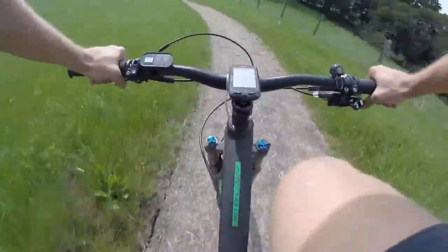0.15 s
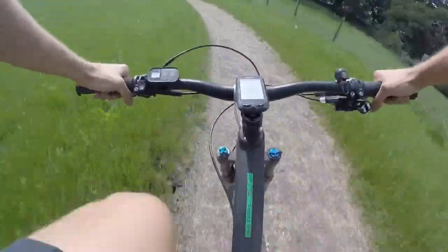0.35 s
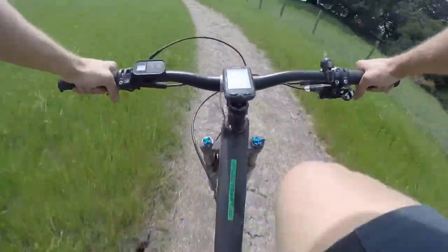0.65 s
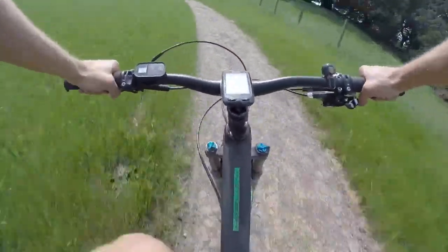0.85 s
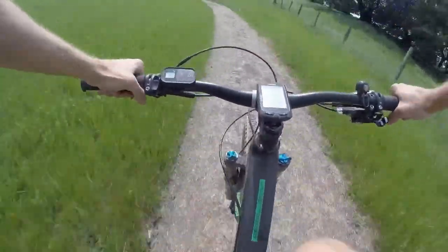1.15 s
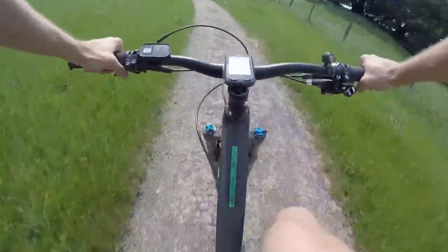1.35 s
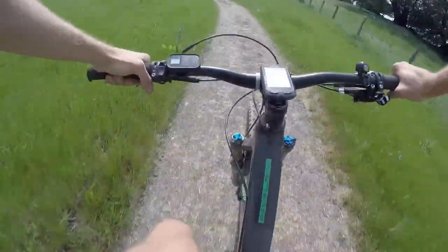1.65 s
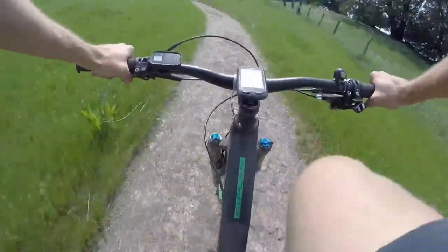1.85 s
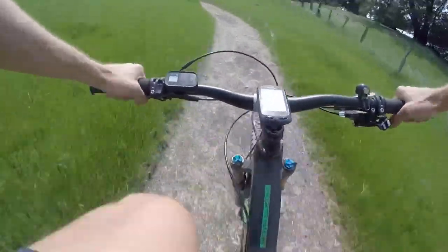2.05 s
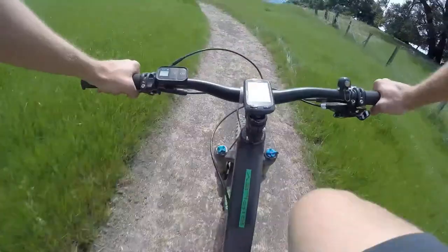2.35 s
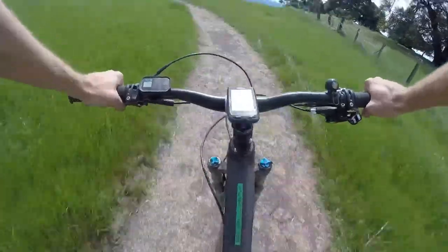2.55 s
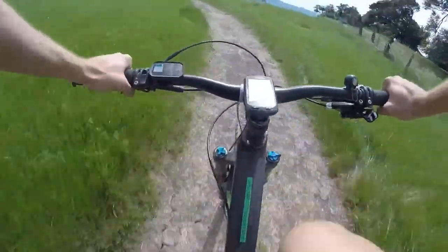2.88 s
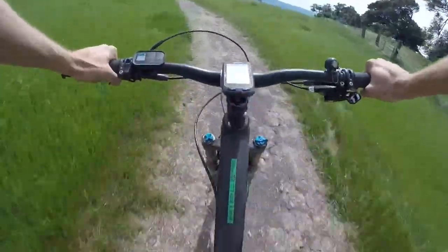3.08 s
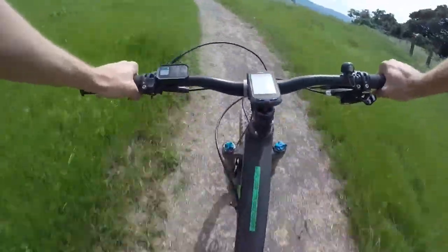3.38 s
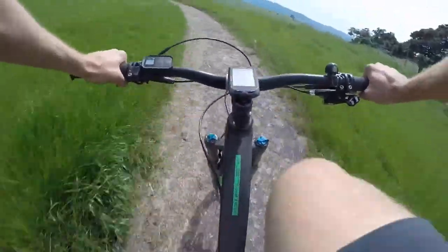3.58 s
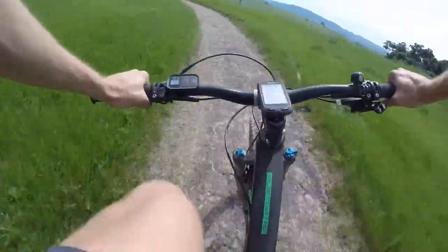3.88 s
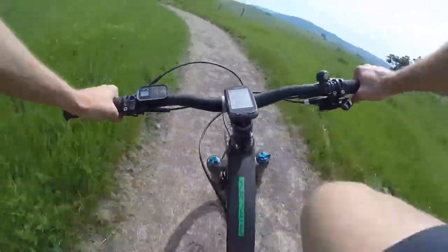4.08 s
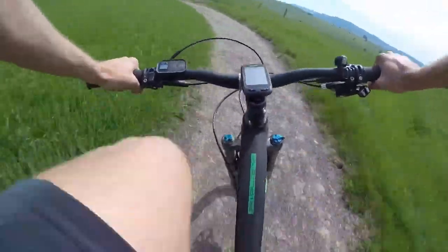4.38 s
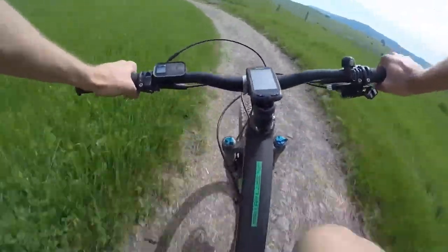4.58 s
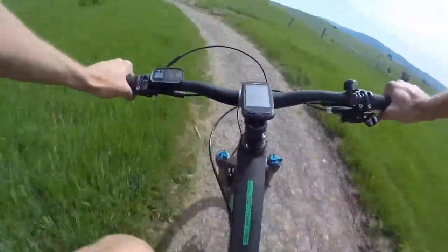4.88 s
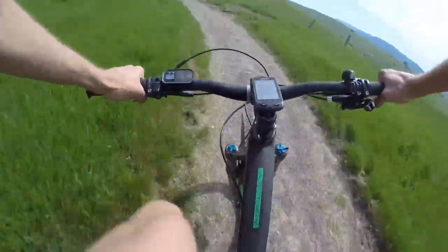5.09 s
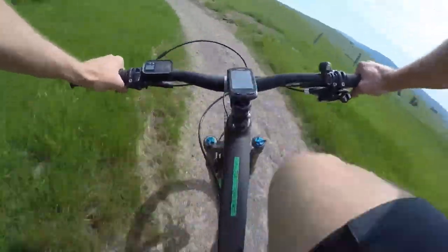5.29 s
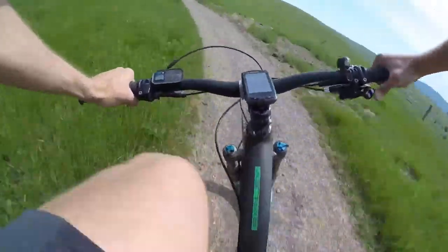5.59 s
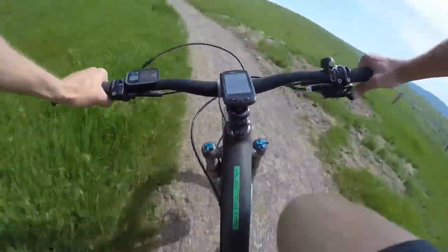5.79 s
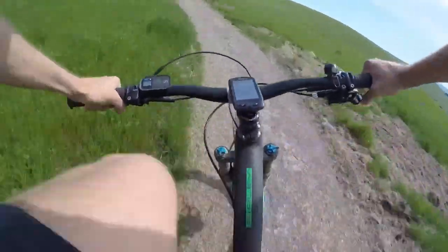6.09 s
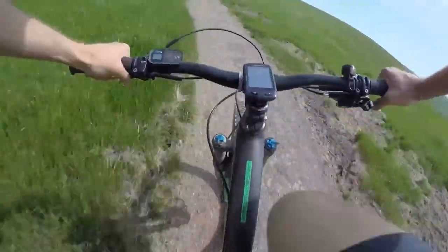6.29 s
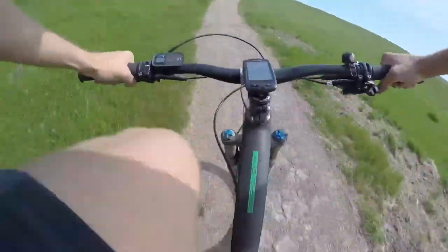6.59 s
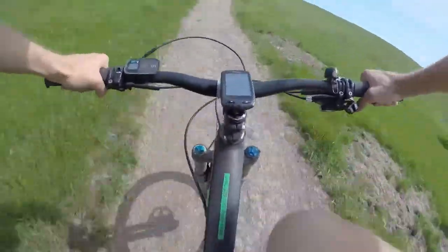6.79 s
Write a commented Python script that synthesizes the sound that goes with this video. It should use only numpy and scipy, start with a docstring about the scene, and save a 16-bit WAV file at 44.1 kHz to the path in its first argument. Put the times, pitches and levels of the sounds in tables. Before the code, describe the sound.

For about seven seconds a bicycle climbs an open gravel trail, heard close and dry from a plastic-cased microphone strapped to the chest. Very deep, uneven swaying rumble and a muffled heartbeat, about three beats a second, run throughout beneath a quiet, clumpy hiss of tyre grit. Short boomy jolts knock the case, with small dull taps between. Bright pebble cracks start at 0.2 s and recur irregularly. Stones clack on the hollow frame at 0.6, 0.9, 1.05, 1.9 and 2.3 s, hardest at 2.75, then at 3.4, 5.2 and 6.3. Brief rough plastic squeaks and rubs come from 2.5 s, again around 3.7, and often after 4.2. Faint, very high insect chirps repeat four or five times a second until 4.9, returning at 6.0. The sharpest, loudest stone crack snaps at 5.85 s; a tiny two-tone insect buzz follows at 6.1. Crunching continues to the end.

```python
"""A bicycle climbs a gravel trail, heard by a camera in a plastic case strapped to the rider's chest.
From the start the mount sways at very low pitch in filtered noise, and tyres crunch in clouds of grit ticks.
Faint sine chirps come from the grass, then ringing stone cracks, jolts with a low boom, and decaying-sine
heartbeats three times a second; from 0.6 s stones clack on the frame tube, one hardest at 2.8 s.
From 2.5 s longer rubs squeak in the case; a stone cracks loudest at 5.9 s and a two-tone buzz follows at 6.1 s."""
import sys
import numpy as np
from scipy import signal
from scipy.fft import rfft, irfft
from scipy.io import wavfile
from scipy.ndimage import uniform_filter1d

SR = 44100
rng = np.random.default_rng(int(sys.argv[2]) if len(sys.argv) > 2 else 0)


def magnitude_from_level(level_db):
    """Linear magnitude for a level in decibels (20 dB per decade)."""
    exponent = np.asarray(level_db, float) / 20
    return 10 ** exponent


def log_audio(samples):
    """Write samples as a 16-bit WAV file to the path given in sys.argv[1]."""
    # one column per channel
    frames = np.atleast_2d(samples).T
    # limit to full scale, then quantise
    limited = np.clip(frames, -1, 1)
    pcm = np.round(limited * 32767).astype(np.int16)
    wavfile.write(sys.argv[1], SR, pcm)


N = 306048  # samples

# insect chirps: start_s
CHIRP_STARTS = [.08, .32, .529, .721, .934, 1.163, 1.377, 1.555, 1.764, 1.955, 2.168, 2.4, 2.602, 2.794,
                3.0, 3.223, 3.405, 3.635, 3.864, 4.025, 4.279, 4.458, 4.702, 4.922, 6.005, 6.186, 6.381,
                6.537, 6.762]
# tyres on grit, joined by straight lines: time_s, level_db
CRUNCH_LEVEL = [(0.0, -50), (1.31, -49), (1.66, -51), (2.63, -49), (2.9, -50), (3.19, -50), (3.67, -52.5),
                (4.1, -48), (4.48, -51.5), (5.32, -49), (5.82, -48), (6.22, -50), (6.57, -47), (6.94, -53)]
# resonances of the camera case: pitch_hz, width_hz, level_db (relative)
CASE_MODES = [(366.4, 84, 10), (783, 148, 4), (1544, 250, 1), (2290, 272, 0.5), (2475, 307, 1.5),
              (2964, 736, -6.5), (4128, 407, -8), (4528, 480, -10), (5976, 600, -12), (7730, 1040, -24),
              (8890, 1300, -27.5), (10800, 3400, -34), (12140, 430, -33.5), (1034, 123, -13.5)]
# longer rubs of the case against its mount: start_s, length_s, level_db
CASE_RUBS = [(2.474, 0.024, -48), (2.556, 0.026, -47), (2.619, 0.029, -46), (2.668, 0.046, -49.5),
             (3.661, 0.022, -47), (3.694, 0.029, -48), (4.204, 0.024, -50), (4.461, 0.082, -49),
             (4.659, 0.037, -44), (4.708, 0.047, -48), (4.793, 0.035, -50), (5.387, 0.022, -51),
             (5.467, 0.018, -46.5), (5.505, 0.019, -48.5), (5.676, 0.017, -47), (5.751, 0.029, -48),
             (6.01, 0.03, -49), (6.258, 0.027, -54), (6.425, 0.033, -50.5), (6.575, 0.034, -53),
             (6.668, 0.02, -47), (6.768, 0.025, -48)]
# loudest stones flicked or cracked by the tyres: start_s, crack_peak_db, hardness_octaves (above 250 Hz, ring most)
STONE_CRACKS = [(0.167, -36, 4.3), (0.299, -37, 4.4), (0.4884, -36.5, 4.5), (0.602, -38.5, 4.5),
                (0.685, -38, 4.7), (1.155, -41, 6), (1.1728, -38, 5.1), (1.211, -36.5, 4.05),
                (1.261, -33.5, 4.43), (1.282, -36.5, 3.6), (1.404, -37, 5.8), (1.578, -47, 6.2),
                (1.6167, -42, 4.5), (2.0817, -35, 5.4), (2.147, -45, 5.6), (2.19, -34.5, 4.2),
                (2.4958, -35.5, 4.55), (3.001, -33, 4.64), (3.016, -42, 5.1), (3.1363, -45, 5),
                (3.2306, -38.5, 3.2), (3.6402, -32.5, 4.53), (3.7256, -39.5, 4.5), (4.16, -34.5, 4.55),
                (4.342, -40, 5), (4.485, -35, 4.2), (4.694, -35.5, 4.5), (4.8347, -38, 4.35),
                (5.048, -45.5, 5.4), (5.088, -36, 4.2), (5.257, -38, 4.6), (5.655, -34, 4.7),
                (5.7808, -41, 5.1), (5.8504, -16.5, 5.28), (5.958, -34.5, 4.7), (5.982, -38, 5.2),
                (6.047, -39.5, 4.8), (6.2836, -45, 5.7), (6.428, -32.5, 4.86), (6.438, -41, 5.4),
                (6.894, -40.5, 5.7)]
# stones thrown against the frame: start_s, ring_peak_db, hardness_octaves (above 250 Hz, ring most)
FRAME_HITS = [(.6225, -28, 2.3), (.911, -24, 2.03), (1.0522, -19, 3.5), (1.8665, -22, 2.15),
              (2.324, -34, 1.6), (2.755, -13.5, 2.78), (2.772, -36, 2.6), (3.356, -22, 2.4),
              (5.2373, -26, 2.34), (6.332, -28.5, 1.5)]
# modes of the frame tube: pitch_hz, width_hz, level_db (relative)
FRAME_MODES = [(364, 88, 8), (840, 306, 6), (1476, 134, -0.5), (2227, 137, -2), (2483, 103, -7.5),
               (3050, 120, -15), (4520, 264, 1), (5770, 240, -10.5), (7500, 180, -30), (8800, 500, -25)]
# jolts of the mount: time_s, thud_peak_db, knock_peak_db (knock of the case)
MOUNT_JOLTS = [(.197, -22.5, -37), (0.262, -20.5, -39), (.787, -21, -30.5), (1.626, -17, -27.5),
               (1.91, -16.5, -30.5), (1.96, -19, -29.5), (2.423, -32, -44), (2.518, -19.5, -55),
               (2.613, -20.5, -44), (2.764, -17.5, -45), (3.555, -27, -33.5), (3.651, -17.5, -59),
               (3.767, -16, -35), (3.815, -21, -37), (3.92, -15.5, -23.5), (4.459, -23, -45),
               (4.704, -18, -41), (4.842, -21, -32), (4.918, -21, -32.5), (5.64, -15, -25),
               (5.73, -20.5, -37), (5.975, -20.5, -48), (6.561, -16.5, -52), (6.656, -26, -35),
               (6.822, -21.5, -39), (6.866, -21, -31)]
# heartbeats, at the deepest point of the kick: time_s, kick_peak_db
HEARTBEATS = [(0.314, -22.2), (0.647, -23.5), (0.966, -19.5), (1.308, -21), (1.631, -26), (1.946, -23.5),
              (2.276, -21.5), (2.602, -22), (2.932, -21), (3.263, -17.5), (3.583, -18.5), (3.924, -18.5),
              (4.248, -20), (4.571, -22.5), (4.901, -17), (5.23, -21), (5.552, -20.5), (5.884, -21),
              (6.222, -23), (6.537, -21.5), (6.867, -22.5)]
# spectrum of the mount's shaking: pitch_hz, level_db (per Hz, relative)
SHAKE_SPECTRUM = [(5.0, -12), (16, 3.5), (39, -3.5), (52, -26), (75, -14.5), (128, -14.5), (349, -29.5),
                  (501, -46.5), (600, -37.5), (780, -43), (1320, -120)]
# strongest heaves of the chest mount, at their tops: time_s, level_db
MOUNT_HEAVES = [(.29, -21), (.48, -20), (.59, -22), (.70, -25), (.81, -23.5), (1.29, -17.5), (1.47, -21),
                (1.82, -28), (2.02, -26), (2.19, -23), (2.463, -18), (3.28, -23), (3.78, -24),
                (4.226, -17.5), (4.44, -26.5), (4.69, -24), (5.03, -26), (5.43, -18.5), (5.79, -22.5),
                (6.28, -27.5), (6.54, -20), (6.72, -27)]
# moments when the mount hangs still: middle_s, half_width_s
STILL_MOMENTS = [(.40, 0.035), (1.12, 0.02), (1.70, 0.024), (2.70, 0.044), (4.10, 0.053), (5.14, 0.027),
                 (5.56, 0.066), (5.93, 0.15)]

# louder grit is coarser: dB of treble lost per dB above this faint reference level
REFERENCE_CRUNCH_DB, COARSENING = -57.5, 0.85
JOLT_RUB_S, JOLT_RUB_DB = 0.0151, -30.5  # each jolt brings a short rub, this far under its thud
SQUEAK_HZ, SQUEAK_WANDER, SQUEAK_DB = 740, 0.031, -6  # mean pitch, its rms wander (fraction), level under the rub
SCRAPE_BELOW_DB, SCRAPE_SPAN_DB = -28.5, 9  # weaker stones scrape more than they ring
DULL_HZ, THUD_HZ = 840, 106.5  # case ring favoured by a soft push; mean pitch of the mount's boom
HEAVE_S, REST_DB, FLUTTER_DB = 0.027, -28.5, 1  # half width of a heave; sway at rest, and its rms flutter
LULL_DB = -5.5  # dip of the sway in a still moment


def evened(x):
    """Scales to rms 1."""
    return x / np.sqrt(np.mean(x ** 2) + 1e-20)


def peaked(x):
    """Scales to peak 1."""
    return x / abs(x).max()


def curve(rows):
    """Joins rows by straight lines, one array a column."""
    s, *columns = np.transpose(rows)
    return [np.interp(np.arange(N) / SR, s, c) for c in columns]


def add(mix, s, sound):
    """Adds a sound into the mix at a time."""
    part = mix[round(s * SR):][:len(sound)]
    part += sound[:len(part)]


def tilted(x, db_per_octave, pivot_hz=3000):
    """Tips the spectrum around a pivot."""
    hz = np.fft.rfftfreq(len(x), 1 / SR)
    return irfft(rfft(x) * magnitude_from_level(db_per_octave * np.log2((hz + 100) / pivot_hz)), len(x))


def slow_noise(top_hz):
    """Low-passed noise of rms 1, for wandering levels."""
    low = signal.butter(2, top_hz, fs=SR, output="sos")
    return evened(signal.sosfiltfilt(low, rng.standard_normal(N)))


def smooth_noise(first, second):
    """Noise of rms 1, averaged over two window lengths in samples."""
    return evened(uniform_filter1d(uniform_filter1d(rng.standard_normal(N), first), second))


def clicks(per_s, spread_db):
    """Random clicks of either sign; a few stand far above the rest, or far below if the spread is negative."""
    hit = rng.random(N) < per_s / SR
    sign = rng.choice([-1., 1.], N)
    return hit * sign * magnitude_from_level(spread_db * np.minimum(rng.exponential(1, N), 3))


def ring(hz, width_hz, rise_s, seconds=.12):
    """A dying sine with a soft start."""
    t = np.arange(round(seconds * SR)) / SR
    return (1 - np.exp(-t / rise_s)) * np.exp(-np.pi * width_hz * t) * np.sin(2 * np.pi * hz * t)


def burst(noise, rise_s, fall_s):
    """A few milliseconds of scraping contact, shaped by a quick rise and fall."""
    t = np.arange(len(noise)) / SR
    return noise * (1 - np.exp(-t / rise_s)) * np.exp(-t / fall_s)


def case(x):
    """Sends a sound through the case, whose modes ring in alternating sign."""
    response = 0
    for k, (hz, width, db) in enumerate(CASE_MODES):
        response = response + (-1) ** k * magnitude_from_level(db) * width * ring(hz, width, 1e-5, .03)
    return signal.oaconvolve(x, response)[:len(x)]


def strike(modes, chance, hardness, reach_db, linger, rise_s=0.00061):
    """One blow rings each mode by its own chance; modes far from the favoured octave ring less."""
    t, sound = np.arange(1024) / SR, 0
    uneven_db = 1.5
    for (hz, width, db), (luck, phase) in zip(modes, chance[:2 * len(modes)].reshape(-1, 2)):
        db = db + uneven_db * luck - reach_db * (np.log2(hz / 250) - hardness) ** 2
        tone = np.sin(2 * np.pi * hz * (1 + 0.0052 * luck) * t + 2 * phase)
        sound = sound + magnitude_from_level(db) * np.exp(-np.pi * width * t / linger) * tone
    return peaked(sound * (1 - np.exp(-t / rise_s)) ** 2)


def patchy(x, patch_db):
    """The colour shifts in small patches of time and pitch as the ground changes."""
    z = signal.stft(x, nperseg=256, noverlap=192)[2]
    patches = uniform_filter1d(rng.standard_normal(z.shape), size=4, axis=0)
    patches = uniform_filter1d(patches, size=18, axis=1)
    return signal.istft(z * magnitude_from_level(patch_db * evened(patches)), nperseg=256, noverlap=192)[1][:len(x)]


def insect():
    """Short flat whistles, slightly unsteady, and one longer two-tone buzz from a neighbour."""
    out, t = np.zeros(N), np.arange(round(0.023 * SR)) / SR
    for s, (detune, phase) in zip(CHIRP_STARTS, rng.standard_normal((len(CHIRP_STARTS), 2))):
        tone = np.sin(2 * np.pi * 10570 * (1 + 0.0026 * detune) * t + phase)
        add(out, s, magnitude_from_level(-71.0) * tone * signal.windows.tukey(len(t), .2))
    t = np.arange(round(0.054 * SR)) / SR
    buzz = np.sin(2 * np.pi * 10000 * t) + .8 * np.sin(2 * np.pi * 10550 * t)
    add(out, 6.127, magnitude_from_level(-70) * buzz * signal.windows.tukey(len(t), .1))
    return out


def crunch():
    """Dense grit ticks merge to a hiss in uneven clumps, with pebble grains and sparse bright crackle on top."""
    level_db, = curve(CRUNCH_LEVEL)
    treble_db = COARSENING * (REFERENCE_CRUNCH_DB - level_db)
    clumps_db = 1.25 * smooth_noise(600, 300)
    hiss = evened(clicks(per_s=5000, spread_db=3.5))
    pebble_shape = burst(np.ones(1024), 0.0006, 0.002)
    pebble_hits = abs(clicks(per_s=140, spread_db=5.5))
    pebbles = signal.oaconvolve(pebble_hits, pebble_shape)[:N] * rng.standard_normal(N)
    crackle_shape = burst(np.ones(512), 0.00065, 0.0021)
    crackle_hits = abs(clicks(per_s=70, spread_db=5.))
    crackle = signal.oaconvolve(crackle_hits, crackle_shape)[:N] * rng.standard_normal(N)
    grains = magnitude_from_level(-1) * evened(tilted(pebbles, 1.5)) + magnitude_from_level(-6) * evened(tilted(crackle, 6.3))
    ground = patchy(magnitude_from_level(clumps_db) * (hiss + grains), patch_db=1.4)
    airborne = signal.butter(2, 1100, "high", fs=SR, output="sos")  # little bass comes through the air
    grit = evened(case(signal.sosfilt(airborne, ground)))
    coarse = signal.sosfiltfilt(signal.butter(1, 3000, fs=SR, output="sos"), grit)
    return magnitude_from_level(level_db) * (coarse + magnitude_from_level(treble_db) * (grit - coarse))


def rattle():
    """Rubbing noise rings the modes of the case, with small dull taps in runs throughout."""
    rubbing = np.zeros(N)
    jolt_rubs = [(s, JOLT_RUB_S, thud_db + JOLT_RUB_DB) for s, thud_db, _ in MOUNT_JOLTS]
    for s, seconds, db in list(CASE_RUBS) + jolt_rubs:
        add(rubbing, s, magnitude_from_level(db) * signal.windows.tukey(round(seconds * SR), .4))
    above_thuds = signal.butter(2, 600, "high", fs=SR, output="sos")
    rub_noise = signal.sosfilt(above_thuds, tilted(rng.standard_normal(N), -4.5))
    rubs = rubbing * evened(case(rub_noise))
    runs = magnitude_from_level(3.5 * smooth_noise(4000, 2000))
    taps = runs * clicks(per_s=90, spread_db=-3.5)
    thuds = signal.oaconvolve(taps, ring(112.5, 95, 0.00091))[:N]
    return rubs + magnitude_from_level(-56.5) * evened(case(tilted(taps, -5.5))) + magnitude_from_level(-46.0) * evened(thuds)


def squeak():
    """In the longer rubs plastic slips on plastic in a nearly even train: a short rough note with overtones."""
    pressing = np.zeros(N)
    for s, seconds, db in CASE_RUBS:
        add(pressing, s, magnitude_from_level(db + SQUEAK_DB) * signal.windows.tukey(round(seconds * SR), .6))
    wander, grip = (evened(uniform_filter1d(rng.standard_normal(N), size)) for size in (600, 300))
    turns = np.cumsum(SQUEAK_HZ * (1 + SQUEAK_WANDER * wander)) / SR
    slips = sum(magnitude_from_level(-1.5 * k) * np.cos(2 * np.pi * k * turns) for k in range(1, 5))
    return pressing * magnitude_from_level(3.4 * grip) * evened(slips)


def stones():
    """Bright cracks with little bass: ringing case modes, a short spray of noise and an airy snap."""
    out, chance = np.zeros(N), rng.standard_normal((len(STONE_CRACKS), 1024))
    thin = signal.butter(3, 2200, "high", fs=SR, output="sos")
    airy = signal.butter(2, [7200, 13600], "band", fs=SR, output="sos")
    for (s, db, hardness), noise in zip(STONE_CRACKS, chance):
        scrape = np.clip((SCRAPE_BELOW_DB - db) / SCRAPE_SPAN_DB, 0, 1)  # 0 rings, 1 scrapes
        contact = burst(noise, 0.00057, 0.0033 + 0.00041 * scrape)
        spray = case(tilted(contact, 7.1 * (hardness - 4.2)))
        reach_db = 8.5 - 4.8 * (hardness - 5.5) * (1 - scrape)
        ringing = strike(CASE_MODES, noise, hardness, reach_db, linger=2.5)
        crack = ringing + magnitude_from_level(-7.0 + 10.0 * scrape) * peaked(signal.sosfilt(thin, spray))
        snap = peaked(signal.sosfilt(airy, burst(noise[::-1], 0.00063, 0.0011)))  # reaches past the case
        snap_db = -12.5 + 8.2 * (hardness - 5.5) - 9. * scrape
        add(out, s, magnitude_from_level(db) * (peaked(crack) + magnitude_from_level(snap_db) * snap))
    return out


def clacks():
    """A stone meets the hollow frame with a broad crack, and the tube rings in a few clear bands."""
    out, chance = np.zeros(N), rng.standard_normal((len(FRAME_HITS), 1024))
    for (s, db, hardness), luck in zip(FRAME_HITS, chance):
        crack = peaked(case(burst(luck[::-1], .0006, .0016)))
        tube = strike(FRAME_MODES, luck, hardness, reach_db=3., linger=0.96, rise_s=0.00072)
        add(out, s, magnitude_from_level(db) * (tube + magnitude_from_level(-8.5) * crack))
    return out


def jolts():
    """A short push rings the mount low, in either direction, and knocks the case."""
    out, chance = np.zeros(N), rng.standard_normal((len(MOUNT_JOLTS), 64))
    for (s, thud_db, knock_db), luck in zip(MOUNT_JOLTS, chance):
        thud = peaked(ring(THUD_HZ * (1 + 0.14 * luck[-1]), 133, 0.00085))
        add(out, s + 0.002, np.sign(luck[-2]) * magnitude_from_level(thud_db) * thud)
        knock = strike(CASE_MODES, luck, np.log2(DULL_HZ / 250), reach_db=6.0, linger=1.43)
        add(out, s + 0.00141, magnitude_from_level(knock_db) * knock)
    return out


def heart():
    """Each beat: a sharp inward kick of the chest wall on a slower heave, both dying sines."""
    kick = -peaked(ring(64.5, 31.8, 0.0067))
    heave = -peaked(ring(23.93, 3.8, 0.085, 0.3))
    out = np.zeros(N)
    for s, db in HEARTBEATS:
        add(out, s - .005, magnitude_from_level(db) * kick)
        add(out, s - .058, magnitude_from_level(db - 8.5) * heave)
    return out


def shake():
    """Muscle tremor and bumps rock the mount: a deep wandering sway with rougher noise above it."""
    hz, db = np.transpose(SHAKE_SPECTRUM)
    colour = magnitude_from_level(np.interp(np.log(np.fft.rfftfreq(N, 1 / SR) + 1), np.log(hz + 1), db))
    sway = irfft(rfft(rng.standard_normal(N)) * colour, N)
    slow = signal.sosfiltfilt(signal.butter(2, 40, fs=SR, output="sos"), sway)
    scale = np.std(slow)
    # dividing by the envelope evens out the swing while the pitch wanders
    steady = evened(slow / (abs(signal.hilbert(slow)) + 0.83 * scale))
    rough = (sway - slow) / scale
    t = np.arange(N) / SR
    rest_power = magnitude_from_level(REST_DB + FLUTTER_DB * slow_noise(9)) ** 2
    heave_power = sum(magnitude_from_level(db) ** 2 * np.exp(-((t - s) / HEAVE_S) ** 2) for s, db in MOUNT_HEAVES)
    still_db = sum(LULL_DB * np.exp(-((t - s) / half) ** 2) for s, half in STILL_MOMENTS)
    level_db = 10 * np.log10(rest_power + heave_power) + still_db
    lumps_db = 5 * np.minimum(slow_noise(14), 1)
    rough_db = 0.37 * level_db - 24.5 + lumps_db + .5 * still_db  # the upper part follows less
    return magnitude_from_level(level_db) * steady + magnitude_from_level(rough_db) * rough


def scene():
    """All sources at the single microphone."""
    body = shake() + heart()
    mount = rattle() + squeak() + jolts()
    trail = clacks() + stones() + crunch() + insect()
    return (body + mount + trail)[None]


def low_pass(x):
    """Removes everything above the highest recorded frequency."""
    return signal.sosfilt(signal.butter(12, 15280, fs=SR, output="sos"), x)


def record(dry):
    """Adds the faint self-noise of the microphone, thinning at the very top."""
    hiss = signal.sosfilt(signal.butter(4, 12300, fs=SR, output="sos"), rng.standard_normal(dry.shape))
    return low_pass(dry + magnitude_from_level(-69.5) * hiss)


dry = scene()
out = record(dry)
log_audio(out)
```